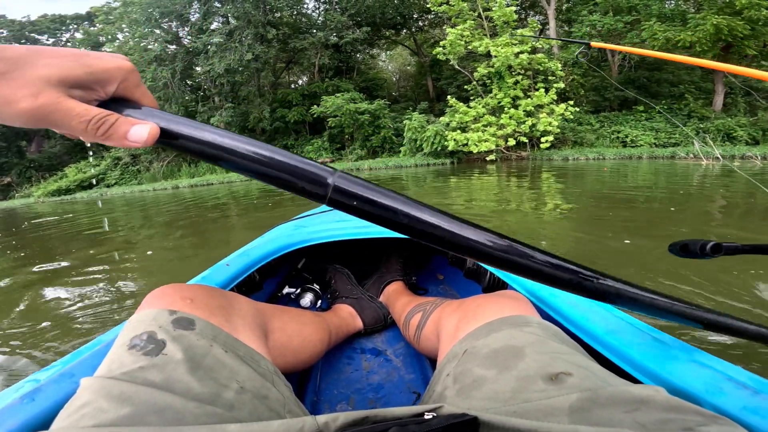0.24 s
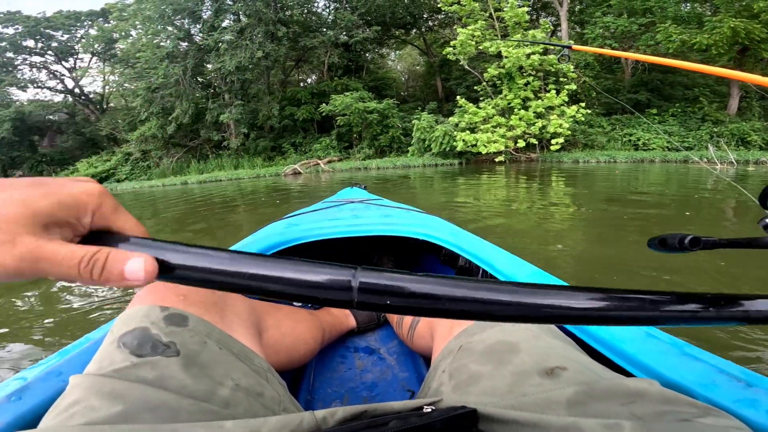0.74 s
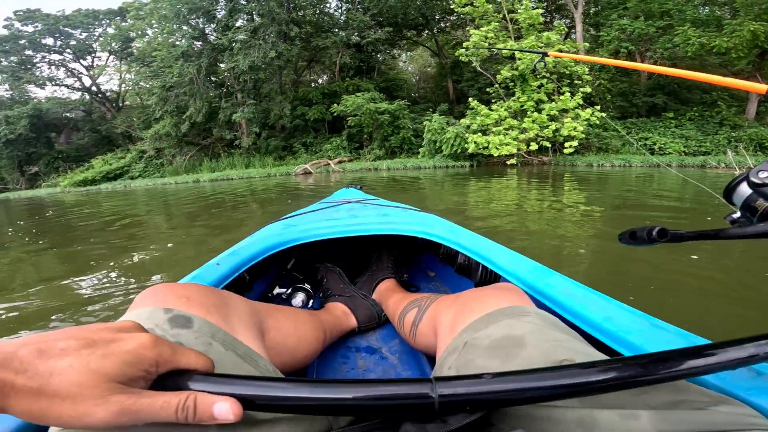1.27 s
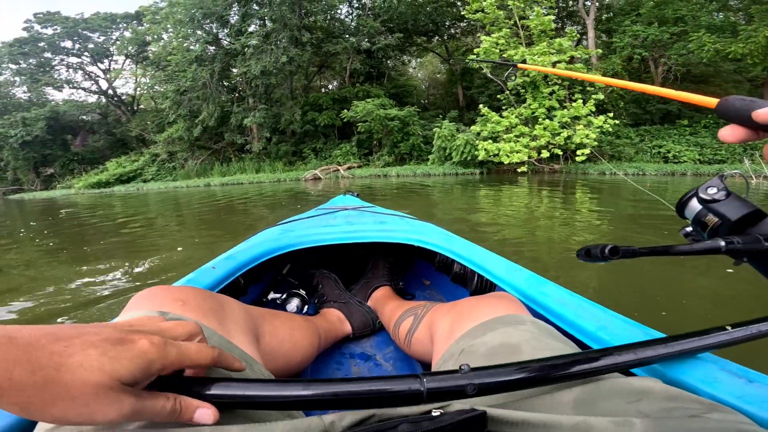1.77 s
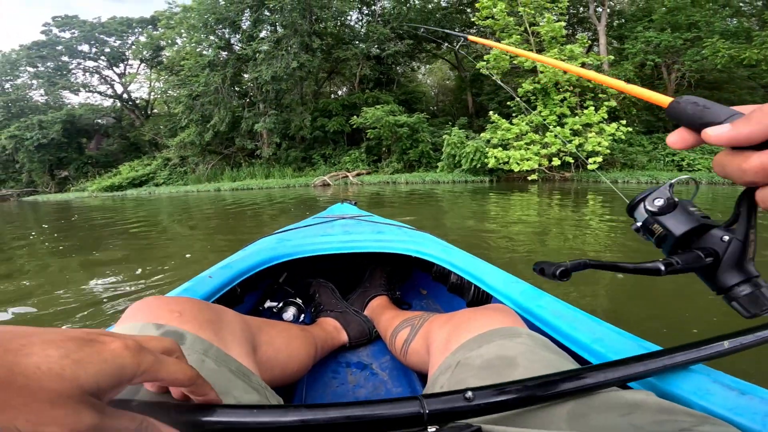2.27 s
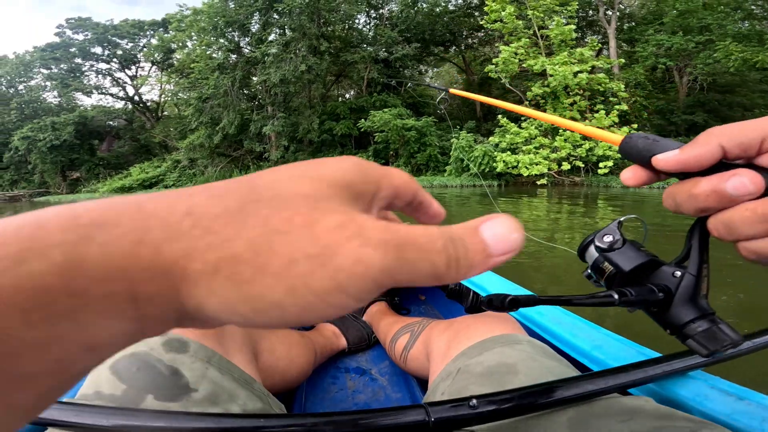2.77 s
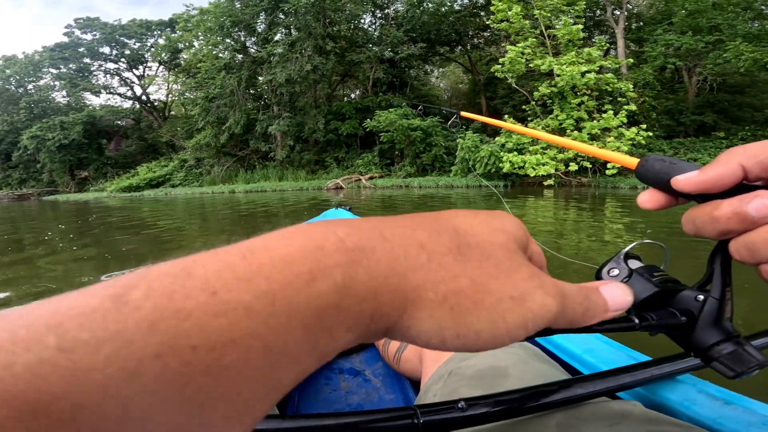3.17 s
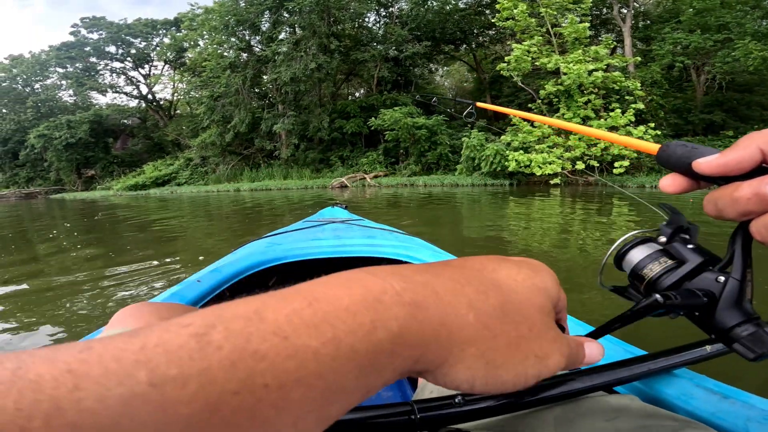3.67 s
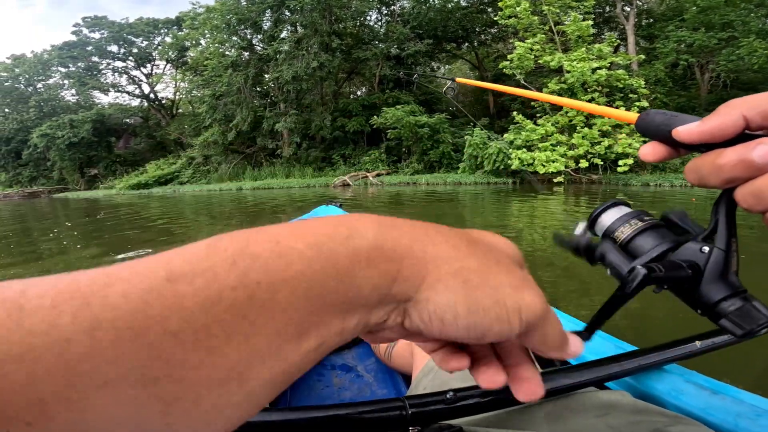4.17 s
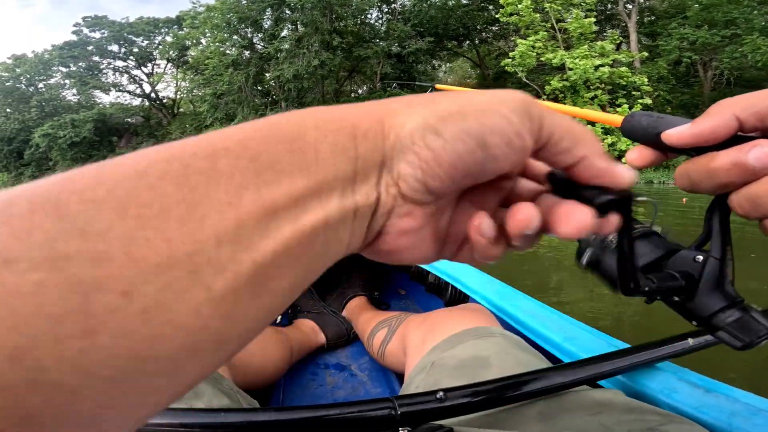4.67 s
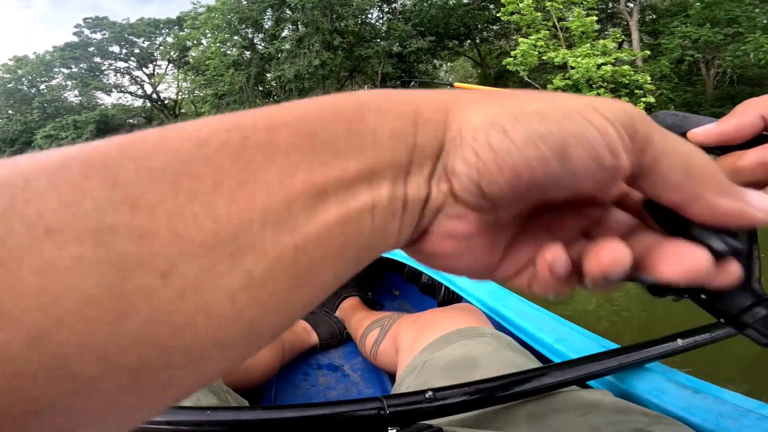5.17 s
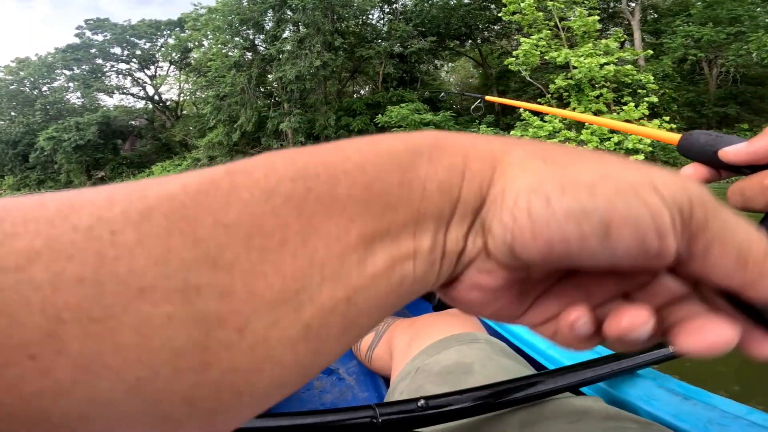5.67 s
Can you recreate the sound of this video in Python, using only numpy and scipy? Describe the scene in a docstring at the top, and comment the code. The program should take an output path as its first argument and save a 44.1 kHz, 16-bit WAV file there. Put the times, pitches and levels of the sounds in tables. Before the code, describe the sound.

Outdoors on a kayak: drips, a paddle knocking the resonant hull, clear rising bird whistles, and finally a rattly fishing reel being wound.

```python
"""Wind buffets the microphone on a wooded pond; water drips and tiny ticks fall, first splats off a paddle.
A songbird whistles falling notes; a paddle is laid down and bounces on a plastic kayak, with cloth sliding.
The songbird goes on to rising notes while a second bird answers; then a fishing reel whirrs and ticks.
Birdsong is gliding sine tones; the hull is ringing sine tones plus dying noise and a noise crack; drips are
rising tones, wind and rubbing are coloured noise, and ticks are short blows sent through resonances."""
import sys
import numpy as np
from scipy import signal
from scipy.fft import rfft, irfft, next_fast_len
from scipy.io import wavfile
from scipy.ndimage import uniform_filter1d, map_coordinates

SR = 44100
rng = np.random.default_rng(int(sys.argv[2]) if len(sys.argv) > 2 else 0)


def persist_wave(psi):
    """Save psi, clipped to +-1, as 16-bit WAV."""
    counts = np.round(np.clip(psi, -1, 1) * 32767).astype(np.int16)
    wavfile.write(sys.argv[1], SR, np.atleast_2d(counts).T)


N = 260631
T = np.arange(N) / SR  # time of each sample, s


def amp(db):
    """Gain of a level in dB."""
    return 10 ** (np.asarray(db) / 20)


def unit(x):
    """Scale x to an rms of 1."""
    return x / np.sqrt(np.mean(x ** 2) + 1e-20)


def along(points, hz, column=1):
    """Read one column of a table at any frequency, on a log frequency axis."""
    table = np.transpose(points)
    return np.interp(np.log(hz + 1), np.log(table[0] + 1), table[column])


def level(rows, column=1, fade=0.0045):
    """Gain per sample from a dB column, fading to silence outside the table (fade in s)."""
    table = np.transpose(rows)
    edge = np.clip(np.minimum(T - table[0, 0], table[0, -1] - T) / fade + 1, 0, 1)
    return edge * amp(np.interp(T, table[0], table[column]))


def wobble(rate):
    """A smooth random curve through rate random points a second."""
    points = rng.standard_normal(int(N * rate / SR) + 4)
    return map_coordinates(points, [T * rate])


def filtered(x, response):
    """Multiply the spectrum of x by a response that depends on frequency."""
    size = next_fast_len(N + SR // 4)
    hz = np.fft.rfftfreq(size, 1 / SR)
    return irfft(rfft(x, size) * response(hz), size)[..., :N]


def rush(gain, alike):
    """Stereo noise of rms 1 with a given colour and left-right likeness (1 = same in both ears)."""
    def mid_side_gain(hz):
        turn = np.arccos(np.clip(along(alike, hz), -1, 1)) / 2
        return gain(hz) * [np.cos(turn), np.sin(turn)]

    mid, side = filtered(rng.standard_normal((2, N)), mid_side_gain)
    return unit(np.array([mid + side, mid - side]))


def add(out, s, sound, pan_db):
    """Mix a short sound into out at time s; pan_db is how much louder the left is."""
    start = round(s * SR)
    part = out[:, start:start + sound.shape[-1]]
    part += amp([[pan_db / 2], [-pan_db / 2]]) * sound[..., :part.shape[1]]


def dying(table, size):
    """Noise in which each frequency has its own level and decay time."""
    hz, t, z = signal.stft(rng.standard_normal(size), SR, nperseg=256)
    start_db = along(table, hz)[:, None]
    t60 = along(table, hz, column=2)[:, None]
    return signal.istft(z * amp(start_db - 60 * t / t60), SR, nperseg=256)[1][:size]


def gritty(depth_db, rate):
    """Friction flutter: a quickly varying random gain of rms 1."""
    return unit(amp(depth_db * wobble(rate)))


def patchy(x, depth_db):
    """Give x drifting patches of gain, some hundred Hz wide and a tenth of a second long."""
    z = signal.stft(x, nperseg=512)[2]
    field = uniform_filter1d(rng.standard_normal(z.shape[1:]), size=6, axis=0)
    field = uniform_filter1d(field, size=12, axis=1)
    return unit(signal.istft(z * amp(depth_db * unit(field)), nperseg=512)[1][:, :N])


def contact(modes, t60, sharp_db):
    """A sharp blow and a short rattle through resonances, each a little different every time."""
    t, f = np.arange(2048) / SR, np.fft.rfftfreq(2048, 1 / SR)
    blow = amp(sharp_db) * np.exp(-2j * np.pi * f * 0.00044) / (1 + 1j * f / 7000) ** 2
    grains = rng.standard_normal(len(t)) + 0.3 * rng.standard_normal((2, len(t)))  # mostly shared by the ears
    swell = 1 - np.exp(-t / (0.00095 * amp(-sharp_db)))  # quicker after a sharper blow
    rattle = grains * amp(-60 * t / max(t60, 1e-3)) * swell
    ring = 0
    for centre, width, db in modes:
        resonance = 1j * f * width / (centre * centre - f * f + 1j * f * width)
        ring = ring + amp(db + rng.normal(0, 1.1)) * resonance ** 2
    return irfft((blow + rfft(rattle)) * ring)


def whistle(s, hz, db):
    """A pure gliding bird note whose loudness flutters slightly."""
    phase = 2 * np.pi * np.cumsum(np.interp(T, s, hz)) / SR
    loudness = level(np.transpose([s, db]), fade=.003) * amp(3 * wobble(110))
    return loudness * np.sqrt(2) * np.sin(phase)


def trees(x, t60):
    """The wood's diffuse answer: x rings on in fading noise that differs at each ear."""
    decay = [(960, -8, t60), (2380, -1, 0.54 * t60), (3430, -2.5, 0.98 * t60), (8300, -2.5, .5 * t60)]
    tail = np.array([dying(decay, SR) for _ in range(2)])
    tail *= 1 - np.exp(-np.arange(SR) / SR / 0.0017)
    return signal.fftconvolve(x[None], tail / np.linalg.norm(tail[0]), axes=1)[:, :N]


def woods():
    """The far hush of leaves and water: steady coloured noise that swells only slightly."""
    # far leaves and water: f/Hz, relative level/dB
    hush_colour = [(200, -30.5), (400, -21), (750, -31), (1100, -25), (2000, -28), (3200, -32.5),
                   (4500, -37), (6000, -40), (8000, -46), (9000, -55), (12000, -62.5), (16000, -69)]
    # how alike the two ears are: f/Hz, likeness
    hush_alike = [(60, 0.89), (180, 0.59), (550, 0.62), (1650, 0.055), (4970, 0.91), (15000, 1)]
    return amp(-54.5 + 0.24 * wobble(2.9)) * rush(lambda hz: amp(along(hush_colour, hz)), hush_alike)


def wind():
    """Turbulence on the microphone: a lumpy rumble, a faster flutter that grows with it, and thumps."""
    # gust strength: t/s, level/dB
    gusts = [(0, -42), (.15, -22.5), (.46, -27), (.72, -30), (.95, -25.5), (1.35, -35), (2.05, -28),
             (2.3, -33.5), (2.55, -51), (2.85, -48), (3.2, -43.5), (4.05, -41), (4.3, -45.5), (4.95, -41.5),
             (5.7, -34.5), (5.91, -39)]
    # colour of the rumble: f/Hz, relative level/dB
    buffet_colour = [(15, -6), (30, 0.5), (60, -3), (100, -18), (160, -23.5), (300, -83)]
    # colour of the faster flutter: f/Hz, relative level/dB
    flutter_colour = [(50, -6), (100, 0.5), (200, -2.5), (350, -11), (500, -50.5), (900, -50)]
    # single gust thumps: centre t/s, level/dB, f/Hz
    thumps = [(.008, -20, 52.7), (.083, -17, 39), (0.106, -18.5, 79), (.16, -6, 119), (.283, -12.5, 59.3),
              (0.3, -16, 81.5), (0.371, -10.5, 87.5), (0.52, -15, 60), (.559, -15, 60.5), (0.59, -12.5, 94),
              (.717, -20.5, 54.5), (1.262, -17.5, 47)]
    flutter_db, flutter_grows = -48, 0.22  # flutter at a -46 dB gust; dB gained per dB of gust
    thump_pan_db = -8  # the right port faces the wind

    lumps = amp(4.2 * wobble(11) + 2.1 * wobble(30))
    rumble = unit(lumps * rush(lambda hz: amp(along(buffet_colour, hz)), [(50, 0.99)]))
    out = level(gusts) * amp([[-1.1], [1.1]]) * rumble

    flutter_level = [(s, flutter_db + flutter_grows * (db + 46)) for s, db in gusts]
    flutter = rush(lambda hz: amp(along(flutter_colour, hz)), [(100, 0.98), (400, 0.74)])
    out += level(flutter_level) * unit(amp(2.53 * wobble(25)) * flutter)

    for s, db, pitch_hz in thumps:
        cycles = np.arange(-1.5, 1.5, pitch_hz / SR)  # counted from the centre
        bump = np.exp(-np.abs(cycles / 0.27) ** 1.43) * np.cos(2 * np.pi * cycles - .5)
        add(out, max(s - 1.5 / pitch_hz, 0), amp(db) * bump, thump_pan_db)
    return out


def far_birds():
    """Other birds further off: short straight glides in pitch, ringing in the trees."""
    # answering notes: start t/s, length/s, first f/Hz, last f/Hz, level before the mix/dB
    answers = [(1.755, 0.073, 3080, 3190, -62), (2.33, .055, 2630, 2820, -54),
               (2.383, 0.042, 2800, 2550, -55), (2.39, .03, 2700, 2250, -56),
               (2.552, 0.083, 2650, 2780, -48), (2.632, 0.042, 2740, 2610, -46),
               (2.637, 0.03, 2680, 2230, -53), (2.814, 0.077, 2700, 2750, -53),
               (2.899, 0.053, 2980, 1950, -43.5), (3.085, .12, 2740, 2764, -57),
               (3.505, 0.0061, 7470, 6900, -59), (3.598, 0.05, 2900, 3020, -59),
               (3.723, 0.067, 2446, 2554, -55.5), (3.866, 0.082, 2500, 2630, -55),
               (3.963, .075, 2870, 2970, -62), (4.43, .03, 3010, 3000, -55),
               (4.514, 0.017, 2900, 2160, -53)]
    far = sum(whistle([s, s + size], [f0, f1], [db, db]) for s, size, f0, f1, db in answers)
    return amp(-3.5) * far + amp(-4) * trees(far, 1.1)


def near_bird():
    """One bird close by on the right: falling, then rising notes, all ringing in the trees."""
    # shape of a falling note: t from its sudden drop/s (before stretching), f/Hz, relative level/dB
    fall_shape = [(-.375, 6320, -3), (-.335, 4964, -3.5), (-.27, 4120, -4), (-.16, 3584, -0.5),
                  (-.018, 2880, -1.5), (0, 2400, 2.5), (0.014, 1916, -2), (.12, 1757, -1.5),
                  (.35, 1862, -31)]
    # falling notes: t of the drop/s, stretch factor, level/dB
    fall_notes = [(.647, 1.05, -50), (1.423, .97, -45)]
    # shape of a rising note: t from its end/s, f/Hz, relative level/dB
    rise_shape = [(-.18, 1184, -11.5), (-.15, 1380, -15), (-.11, 1620, -7.5), (-.06, 1800, -6.5),
                  (-.031, 2236, -5.5), (-.021, 2640, -2.5), (-.012, 3380, -4), (-.004, 3950, -4.5),
                  (.001, 4740, -21)]
    # rising notes: end t/s, level/dB, length/s
    rise_notes = [(1.898, -41, .115), (2.197, -38, .18), (2.487, -38, .18), (2.776, -38, .18),
                  (3.069, -39, .18), (3.365, -38.5, .18)]
    # overtones of a rising note: multiple of its pitch, relative level/dB
    multiples = [(3, -36), (4, -27)]
    # overtones pass only near the beak's resonance: f/Hz, gain/dB
    beak_gain = [(3000, -30), (5000, 6), (6600, -15), (7400, 10), (8000, 3), (8600, -12)]
    swell_s, tree_t60 = 0.045, 1.1  # a rising note fades in; decay time of the wood

    around, fall_hz, fall_db = np.transpose(fall_shape)
    falls = sum(whistle(s + stretch * around, fall_hz, db + fall_db) for s, stretch, db in fall_notes)

    before, rise_hz, rise_db = np.transpose(rise_shape)
    rises = 0
    for end, db, size in rise_notes:
        s, note_db = end + before, db + rise_db
        overtones = sum(whistle(s, k * rise_hz, note_db + weak_db) for k, weak_db in multiples)
        note = whistle(s, rise_hz, note_db) + filtered(overtones, lambda hz: amp(along(beak_gain, hz)))
        rises = rises + np.clip((T - end + size) / swell_s + .5, 0, 1) * note

    direct = amp([[-1.1], [1.1]]) * (falls + rises)
    return direct + amp(0.5) * trees(falls, tree_t60) + amp(1.5) * trees(rises, tree_t60)


def drips_and_shaft_ring():
    """Drops from blade and line, and one thin ring of the shaft: tones that rise in pitch as they fade."""
    # drops, and one thin ring of the paddle shaft at 1.118 s:
    # t/s, level/dB, starting f/Hz, decay time t60/s, left over right/dB
    tones = [(0.241, -37.5, 1470, 0.038, -3), (.285, -40.5, 2360, 0.026, 0), (.313, -43, 1200, .03, 0),
             (0.34, -34, 2560, 0.021, 8), (.395, -42, 580, 0.046, 0), (.41, -48, 3040, .1, 0),
             (.505, -46, 1290, .04, 0), (.583, -37, 1960, .025, -4), (.754, -31.5, 2730, 0.031, 10),
             (.83, -46, 930, .04, 0), (.961, -39, 758, .09, -3), (1.118, -40, 2850, 0.154, 2),
             (1.184, -28, 1545, 0.027, -6), (4.106, -31, 1660, 0.035, -8), (4.342, -34.5, 1760, 0.032, -9),
             (5.006, -29.5, 1284, 0.091, -6)]
    out, t = np.zeros((2, N)), np.arange(SR // 5) / SR
    for s, db, hz, t60, pan_db in tones:
        swell = (1 - np.exp(-t / 0.00052)) * amp(db - 60 * t / t60)
        add(out, s, swell * np.sin(2 * np.pi * hz * t * (1 + 0.059 * t / t60)), pan_db)
    return out


def cloth():
    """Hand and cloth slide on the paddle shaft: gritty noise that swells, holds and stops."""
    # slides: start t/s, full t/s, stop t/s, level before the mix/dB
    slides = [(1.31, 1.486, 1.61, -47), (1.796, 2.02, 2.24, -53.5)]
    # colour of the cloth: f/Hz, relative level/dB
    cloth_colour = [(590, -51), (1000, -12), (1730, -9), (1940, -13), (2440, -9), (9600, -23), (13300, -40),
                    (16000, -75)]
    rise_db, stop_s = 6, 0.027  # swell from start to full; release
    strength = sum(level([(start, db - rise_db), (full, db), (stop, db), (stop + stop_s, db - 48)])
                   for start, full, stop, db in slides)
    noise = rush(lambda hz: amp(along(cloth_colour, hz)), [(1000, 0.98)])
    return amp(0.5) * strength * gritty(2.2, 290) * noise


def reel():
    """The wound reel: line and gears hiss, the case resonates, and a whirr drifts in pitch."""
    # winding: t/s, line and gear hiss level before the mix/dB, gear case level before the mix/dB
    winding = [(3.85, -74, -68), (4.04, -60.5, -53), (4.16, -52.5, -58), (4.32, -51, -69),
               (4.47, -54.5, -54), (4.73, -45.5, -51.5), (4.85, -47.5, -57.5), (5.19, -46, -46.5),
               (5.42, -46.5, -67), (5.65, -44.5, -46.5), (5.91, -45.5, -55.5)]
    # colour of the hiss: f/Hz, relative level/dB
    hiss_colour = [(290, 0.5), (500, -2), (750, -9.5), (1400, -4), (1740, -3.5), (2430, -1), (3110, -7),
                   (4530, -4), (7530, -11.5), (12000, -25), (16000, -62)]
    # case resonances: f/Hz, width/Hz, relative level before squaring/dB
    case_modes = [(1392, 280, 16), (2380, 110, -13)]
    whirr_centre_hz, whirr_drift_hz = 4740, 293.5  # drift multiplies a random curve

    crank = amp(1.5 * wobble(20))  # uneven hand
    hiss = rush(lambda hz: amp(along(hiss_colour, hz)), [(1000, .9), (5000, .8), (12000, .5)])
    line = crank * level(winding) * gritty(3, 300) * patchy(hiss, depth_db=2.6)

    def case_gain(f):
        return sum(amp(db) * f * w / np.abs(c * c - f * f + 1j * f * w) for c, w, db in case_modes) ** 2

    gears = level(winding, column=2) * gritty(1.5, 120) * rush(case_gain, [(1000, .9)])

    whirr_hz = whirr_centre_hz + whirr_drift_hz * wobble(7.8)
    tone = np.sin(2 * np.pi * np.cumsum(whirr_hz) / SR)
    whirr = amp(-4.0) * level(winding) * gritty(9.5, 37) * wobble(1100) * tone
    return amp([[-.8], [.8]]) * (amp(-0.5) * line + gears + amp(-3.0) * whirr)


def reel_clicks():
    """Play in the reel's handle and bail: each knock rings metal parts and the case."""
    # knocks: t/s, metal level/dB, case level/dB, case brightness/dB per octave, first blow over rattle/dB
    clicks = [(3.875, -60, -38, 8, 3), (3.954, -12.5, -16.5, -1.5, 4.5), (4.04, -49, -40, -9, 4),
              (4.143, -27.5, -26, 1.5, 19), (4.648, -27, -28.5, 13, 7), (4.7507, -27, -39, -6, -1),
              (4.887, -19.5, -25.5, -3, -1), (4.9191, -33, -27.5, 30, 15.5), (5.0837, -39, -39, -6, 5),
              (5.18, -25, -22.5, 6, 1), (5.1961, -29, -25.5, -1.5, 19), (5.2715, -28, -50, 0, 5),
              (5.2963, -19.5, -24, -3, 4), (5.3052, -21, -12, -3.5, -0.5), (5.324, -15.5, -23.5, 8, 6),
              (5.333, -45, -23.5, -9, 3), (5.344, -22.5, -26, -8, -2), (5.4318, -15.5, -26.5, 8, 2.5),
              (5.4441, -40, -13, 10, 4), (5.45, -22, -21, 0.5, 20), (5.4612, -19.5, -33, -8, 4),
              (5.4726, -16, -23, 3, 13), (5.5664, -45, -28, -1, 18), (5.5724, -17.5, -19.5, -9.5, -0.5),
              (5.604, -25.5, -27.5, 16, 4), (5.6202, -32, -33, -4, 5), (5.662, -23, -33, 6, 2),
              (5.7107, -19.5, -23.5, 13, 23.5), (5.721, -25, -28.5, -9, 16), (5.732, -22, -19.5, -4.5, -4),
              (5.7487, -16, -38, 0, 17.5), (5.843, -21.5, -35.5, -10, -4)]
    # metal parts: f/Hz, width before squaring/Hz, relative level/dB
    metal_modes = [(4855, 1500, 9), (5970, 1490, 1), (3660, 400, 7)]
    # reel case when struck: f/Hz, width before squaring/Hz, relative level/dB
    body_modes = [(1520, 720, 15), (2064, 730, 9.5), (700, 235, 3)]
    t60, metal_pan_db, body_pan_db = 0.013, -1, -4  # rattle decay in s; left over right in dB
    out = np.zeros((2, N))
    for s, metal_db, case_db, tilt_db, sharp_db in clicks:
        add(out, s, amp(metal_db) * contact(metal_modes, t60, sharp_db), metal_pan_db)
        tilted = [(hz, w, db + tilt_db * np.log2(hz / 1700)) for hz, w, db in body_modes]
        add(out, s, amp(case_db) * contact(tilted, t60, sharp_db), body_pan_db)
    return out


def ticks():
    """Tiny ticks, each a short blow and rattle through resonances; faint ones fall at random."""
    # probably splats of water from the paddle in the first second, later contacts on paddle, deck and reel:
    # t/s, level/dB, f/Hz, left over right/dB
    tick_rows = [(.021, -40, 3550, 8), (.1413, -22, 4180, 6), (.164, -27, 3070, 11), (.2077, -38, 2950, -2),
                 (.3511, -15.5, 3170, 8), (.3737, -28, 4020, 7), (.4479, -36, 3750, 6),
                 (.5836, -23, 3400, 8), (.755, -30, 2400, 2), (.9541, -27.5, 4070, -5),
                 (1.0212, -24.5, 6600, 9), (1.3152, -14.5, 4450, 5), (1.8383, -30.5, 3070, 5),
                 (1.9044, -21, 3450, 3), (2.279, -53, 3500, 0), (2.5874, -34.5, 3250, 1),
                 (3.215, -35, 3020, 3), (3.2424, -35, 4230, 6), (3.5084, -39, 3850, -1.5),
                 (3.785, -34, 5840, -2)]
    t60, dull_db, sharp_db = 0.0095, -19, 4.5  # rattle decay in s; dull part; first blow over rattle
    out = np.zeros((2, N))
    draw = rng.uniform(size=(220, 4))
    # about a fifth fall while the paddle drips, the rest while the reel turns
    when = np.where(draw[:, 0] < .2, draw[:, 0] * 5.2, 4.2 + (draw[:, 0] - .2) * 2.1)
    faint = [(s, -47 + 13 * a ** 3, 3200 + 5000 * b, 10 * c - 5) for s, (a, b, c) in zip(when, draw[:, 1:])]
    for s, db, hz, pan_db in [*tick_rows, *faint]:
        modes = [(hz, 1670, 7.5), (6000, 2670, -4), (1500, 950, 17 + dull_db)]
        add(out, s, amp(db) * contact(modes, t60, sharp_db), pan_db)
    return out


def paddle():
    """Each blow rings the hull; low modes build slowly as the wave spreads along it."""
    # paddle on hull: t/s, overall level/dB, boom/dB, crack/dB, freedom to ring (multiplies the decay times)
    knocks = [(1.112, 0, -22.5, -25, 0.23), (1.511, -15, -14, -32, 0.24), (1.522, -0.5, -13, -11.5, 0.75),
              (1.548, -14.5, 2, -18, 1.47), (1.601, -15, -2.5, -24, 0.91), (1.669, -28, -1.5, -36, 1.07),
              (1.705, -39, 13, -24, 0.84), (1.926, -5, -9.5, -29, 0.91), (1.945, -18, 5.5, -28, 0.98),
              (2.171, -15, -4.5, -43, 1.05), (2.198, -29, 7, -39, 0.74)]
    # single hull modes: f/Hz, relative level/dB, decay time t60 at freedom 1/s
    hull_modes = [(103.6, -1.5, 0.49), (124, -22, 0.33), (141.3, -0.5, 0.4), (158.3, -5.5, 0.31),
                  (226.5, -10, 0.34), (255, -13, 0.09), (300.3, -7, 0.3), (368, -28, 0.21),
                  (398, -10, 0.17), (470, -8.5, 0.16), (511, -15, 0.11), (604, -19, 0.23),
                  (699, -13.5, 0.18), (758, -20.5, 0.1), (945, -22, 0.19), (975, -14, .1),
                  (1063, -12.5, 0.12), (1195, -14, 0.08), (1264, -10, 0.074), (1430, -23.5, 0.25),
                  (1590, -7.5, 0.023), (1870, -18, 0.078), (2020, -23, 0.049), (3020, -20, 0.045)]
    # dense small modes of the shell: f/Hz, relative level/dB, decay time t60 at freedom 1/s
    shell_modes = [(60, -37, 0.88), (118, -1, 0.43), (397, -4, 0.14), (1020, -23, 0.21),
                   (3460, -27.5, 0.071), (8000, -49.5, 0.054), (16200, -65, 0.018)]
    crack_shape = [-1, -2, -1, 1, 3, 3, 1, -1, -2, -1]

    out, t = np.zeros((2, N)), np.arange(SR // 2) / SR
    hz, db, t60 = np.transpose(hull_modes)[:, :, None]
    for s, knock_db, boom_db, crack_db, free in knocks:
        low_db = lambda f: boom_db / (1 + (f / 450) ** 4)  # the boom acts mainly on the low modes
        mode_db = db + low_db(hz) + rng.normal(0, 1.55, hz.shape)
        strength = amp(mode_db - 60 * t / (free * t60)) * (1 - np.exp(-t * hz / 1.14))
        ring = (strength * np.sin(2 * np.pi * hz * t + rng.uniform(0, 2 * np.pi, hz.shape))).sum(axis=0)

        struck = [(f, d + low_db(f), free * k) for f, d, k in shell_modes]
        shell = [dying(struck, len(t)) for _ in range(2)]

        # the shaft answers first, most clearly on a damped hull
        snap = np.sin(2 * np.pi * 960 * t) * amp(-29 - 60 * t / 0.012)
        snap *= (1 - np.exp(-t / 0.0011)) / free ** 2

        # the deck gives way once
        dent = amp(boom_db + 6) * np.exp(-((t - .005) / 0.0018) ** 2) * np.cos(2 * np.pi * 260 * (t - .005))

        grains = np.convolve(rng.standard_normal(len(t)), crack_shape, "same")
        crack = grains * amp(crack_db - 20 - 60 * t / .006)

        both = amp(-1.5) * ring + amp(18.5) * shell[0] + snap + dent + crack
        apart = amp(-12.0) * shell[1]  # the hull is wide: each ear hears a slightly different part
        add(out, s, amp(knock_db) * np.array([both + apart, both - apart]), -.4)
    return out


def from_right(x):
    """Blows land on the right, so the phase differs between the ears by an amount set by pitch."""
    # phase between the ears: f/Hz, left ahead of right/rad
    lead = [(100, 0.016), (700, -0.31), (1300, -0.56), (2600, -1.4), (4300, 0.094), (16000, 0.32)]
    return filtered(x, lambda hz: np.exp(.5j * along(lead, hz) * [[1], [-1]]))


def scene():
    """All sources, with a faint echo of the paddle, ticks and clicks from the bank."""
    gear = from_right(paddle()) + ticks() + reel_clicks()
    echo = amp(-17.5) * trees(gear.mean(axis=0), 0.22)
    birds = near_bird() + far_birds()
    return gear + echo + drips_and_shaft_ring() + cloth() + reel() + birds + woods() + wind()


def record(dry):
    """The left port hears a little late; soft clipping at full scale, a treble roll-off and a band limit."""
    # microphone response: f/Hz, gain/dB
    mic_gain = [(20, 1), (9000, 1), (12000, 3.5), (14000, -2.5), (16000, -27)]
    lag_s, top_hz = 15e-6, 15900  # left behind right; band limit
    ports = filtered(dry, lambda hz: np.exp(-2j * np.pi * hz * [[lag_s / 2], [-lag_s / 2]]))
    soft = ports / (1 + np.abs(ports) ** 6) ** (1 / 6)
    return filtered(soft, lambda hz: amp(along(mic_gain, hz)) * (hz < top_hz))


dry = scene()
out = record(dry)
persist_wave(out)
```